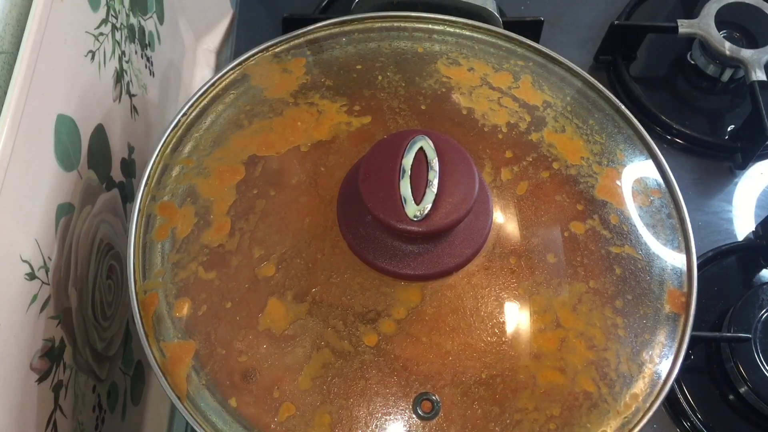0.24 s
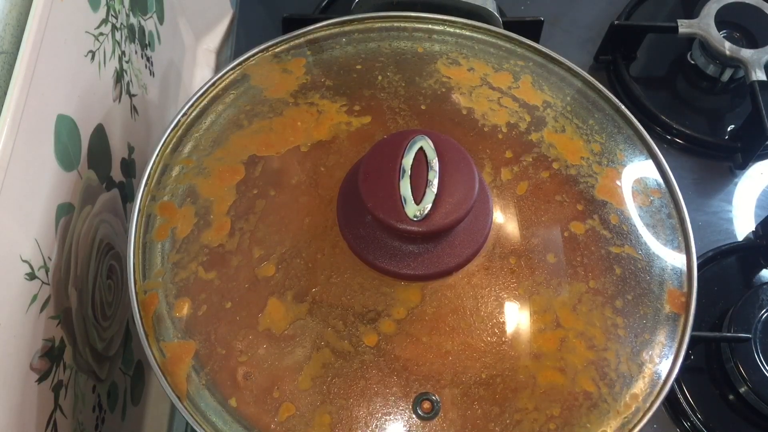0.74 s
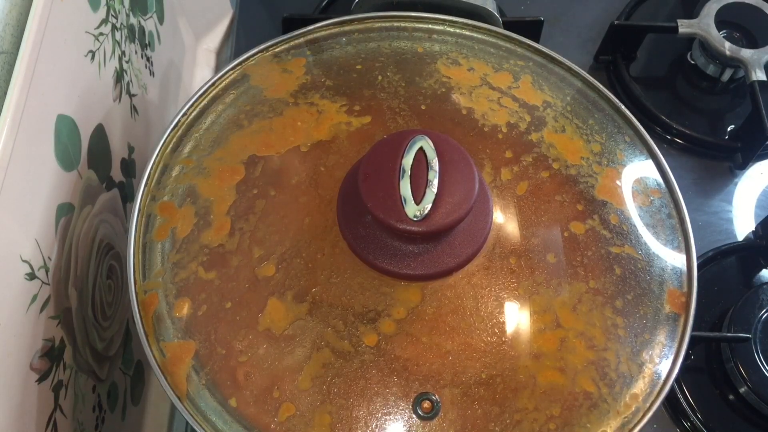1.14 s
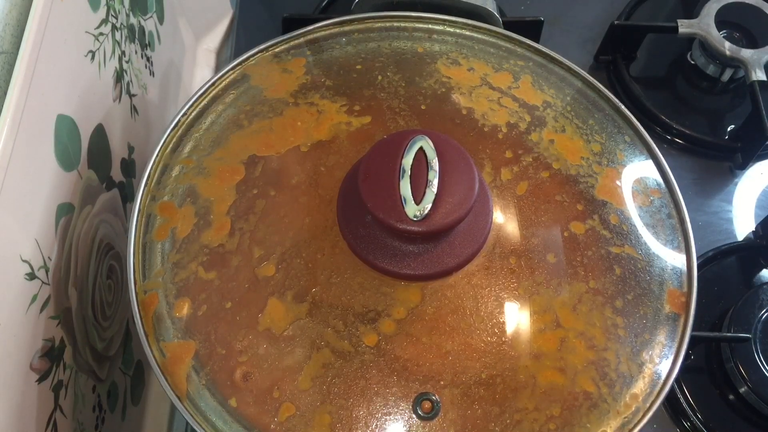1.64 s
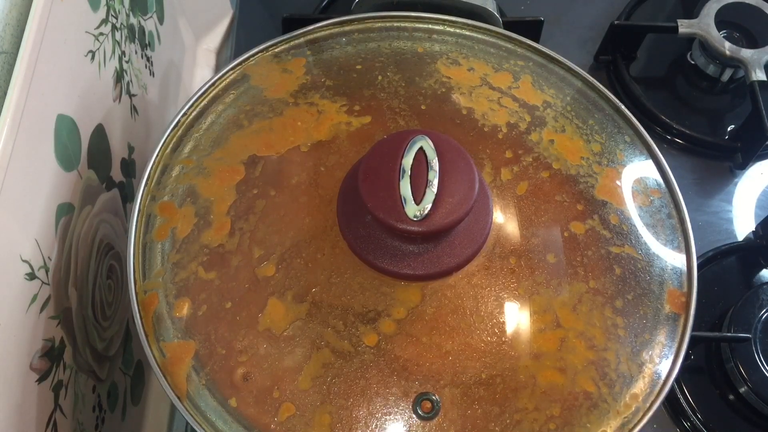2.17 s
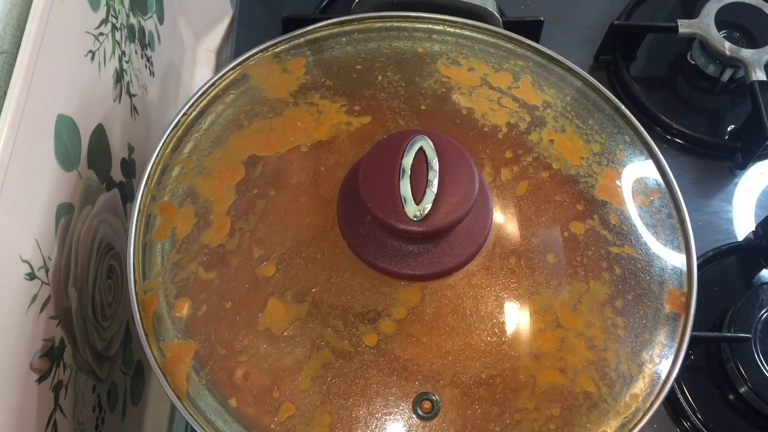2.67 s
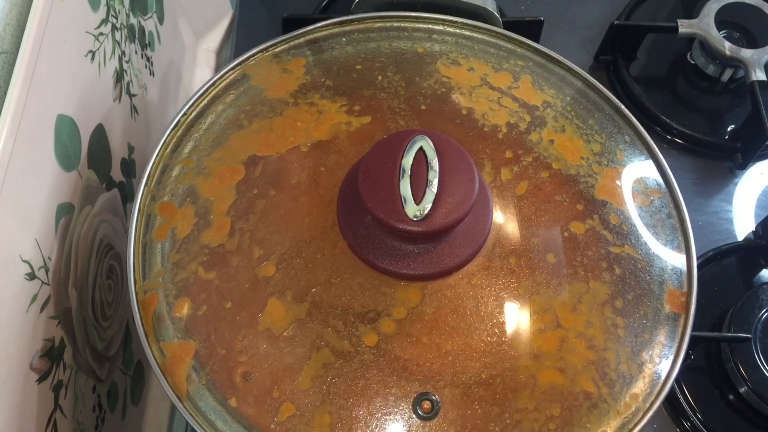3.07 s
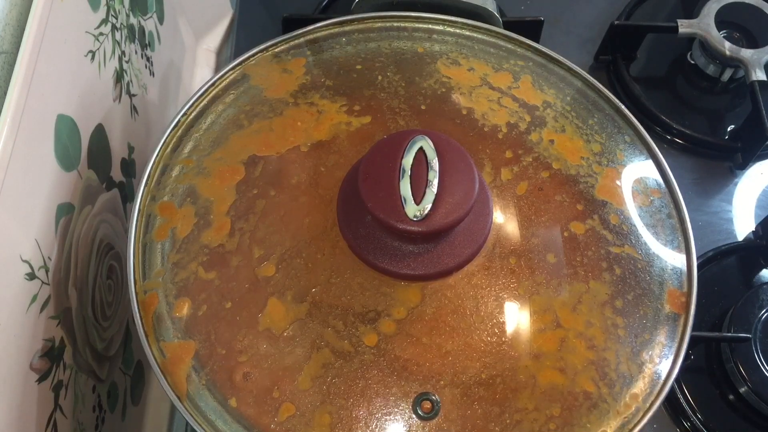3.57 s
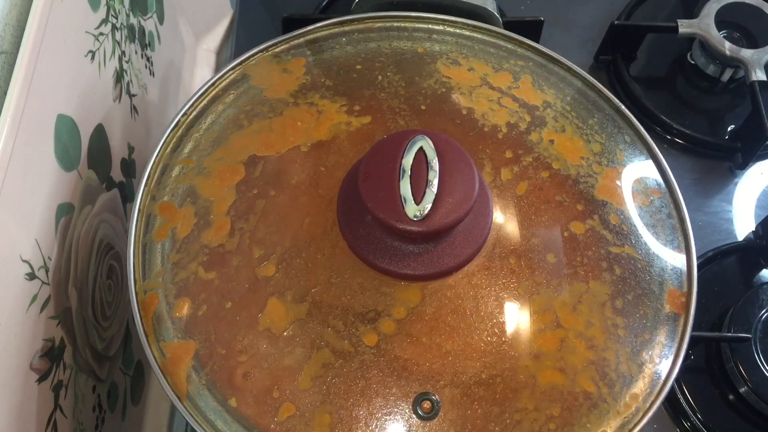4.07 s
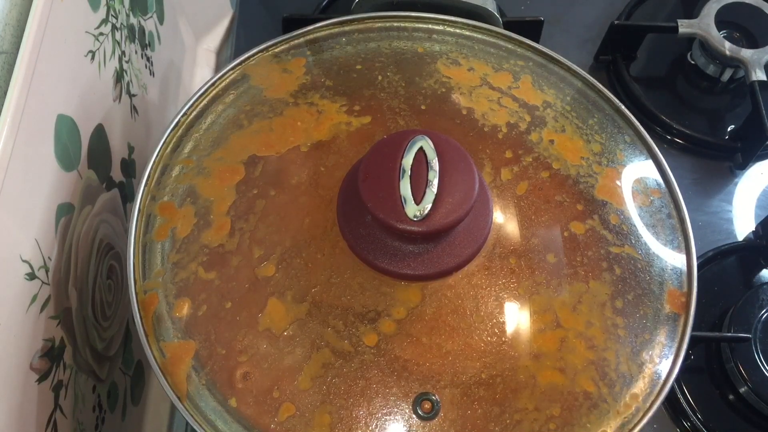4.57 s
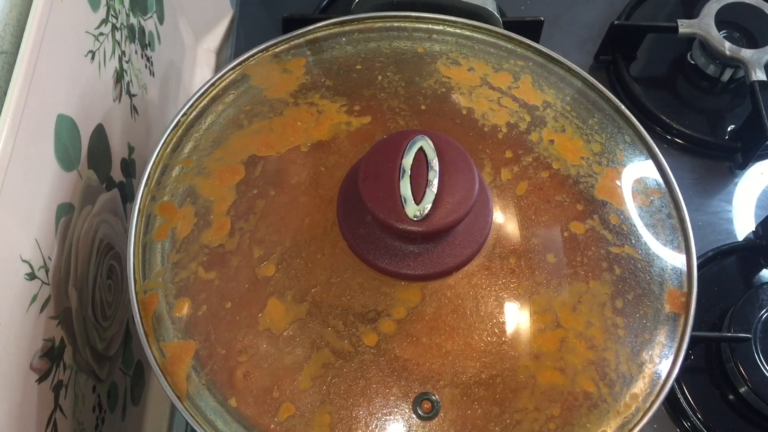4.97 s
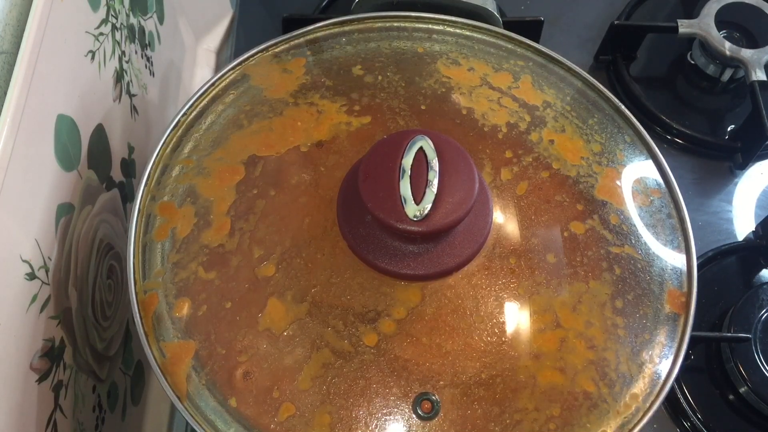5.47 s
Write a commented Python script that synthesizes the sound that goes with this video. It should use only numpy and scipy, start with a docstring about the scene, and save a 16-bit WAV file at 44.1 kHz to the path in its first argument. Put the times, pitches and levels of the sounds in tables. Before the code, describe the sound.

A covered pot of thick sauce bubbles steadily, heard close from above in a small, fairly dry kitchen. Low rounded glugs come irregularly, about a dozen a second, each rising slightly and ringing hollowly under the lid. Wet plips, sharp snaps and tiny spatters scatter between them, over a murmur of small bubbles and a quiet burner rush. The boil eases near two seconds, then grows stronger. Mono.

```python
"""Thick sauce simmers in a steel pot under a glass lid, heard from just above in a small kitchen.
Big bubbles are gliding tones that glug and set the air under the lid ringing.
Their skins snap and throw spray, made of short tones and ragged bursts of noise.
Swarms of tiny gliding tones fill the gaps, over the burner's low rush of filtered noise."""
import sys
import numpy as np
from scipy import signal
from scipy.fft import rfft, irfft, next_fast_len
from scipy.io import wavfile

SR = 44100
rng = np.random.default_rng(int(sys.argv[2]) if len(sys.argv) > 2 else 0)


def digitize_waveform(pressure):
    """Quantize a signal to 16-bit integers and store it at the path in sys.argv[1].

    Rows of a 2-D input are taken as channels; values are limited to [-1, 1].
    """
    field = np.atleast_2d(pressure).T
    bounded = np.clip(field, -1, 1)
    quanta = np.round(bounded * 32767).astype(np.int16)
    wavfile.write(sys.argv[1], SR, quanta)


N = 251811  # length of the scene in samples

# the burner's drone, as resonances: (centre [Hz], width [Hz], relative level [dB])
BURNER_DRONE = [(45.5, 9.8, -31), (140.2, 34, -6.5)]
# vigour of the boil: (time [s], level [dB])
BOIL_VIGOUR = [(0, 3), (1.6, -3.5), (2.3, -1), (2.8, 2), (3.8, 3.5), (4.8, 3.5), (5.7, 1)]

LIFE = np.arange(SR // 6) / SR  # time within one bubble's sound [s]
FREQS = np.fft.rfftfreq(2 * len(LIFE), 1 / SR)  # its spectrum's frequencies [Hz]
FIRST_20_MS = SR // 50  # samples
KITCHEN_T60 = 0.28  # time for the kitchen's echo to fall by 60 dB [s]
TOP_HZ = 15950  # nothing is kept from here up


def amp(db):
    """Turn decibels into a plain multiplier."""
    return 10 ** (np.asarray(db) / 20)


def unit(x):
    """Scale a sound to an rms (average strength) of 1."""
    return x / np.sqrt(np.mean(x ** 2) + 1e-20)


def fade(t60):
    """A steady decay over the life of one bubble, losing 60 dB in t60 seconds."""
    return amp(-60 * LIFE / t60)


def filtered(x, response):
    """Shape x by a complex response, given as a function of frequency."""
    m = next_fast_len(N + SR // 2)  # spare room, so that tails do not wrap round to the start
    freqs = np.fft.rfftfreq(m, 1 / SR)
    return irfft(rfft(x, m) * response(freqs), m)[:N]


def resonances(modes, f):
    """Sum of resonances (Hz, width, dB): each answers most strongly at its own pitch."""
    return sum(amp(db) * 1j * f * width / (hz * hz - f * f + 1j * f * width) for hz, width, db in modes)


def band(f, lo_hz, hi_hz, order=3):
    """Response that passes the pitches between two limits."""
    sos = signal.butter(order, [lo_hz, min(hi_hz, SR / 2 - 1)], "bandpass", fs=SR, output="sos")
    return signal.sosfreqz(sos, f, fs=SR)[1]


def pot(f, high_db=-12, top_db=-22, leak_db=-35):
    """The covered pot: its resonances, and a little sound that slips past the lid."""
    # low resonances: (centre [Hz], width [Hz], relative level [dB])
    low_modes = [(132.6, 9.6, -8.5), (231.2, 26.4, -7.5), (323, 15, -1.5), (333.9, 17.3, -1),
                 (375, 12.6, -7.5), (496, 16.2, -2.5), (621.4, 13.7, -15.5), (860, 87, -34),
                 (998, 95, -24.5), (1092.5, 19.4, -15), (1153, 9.6, -2), (1162.4, 15.2, -4),
                 (1544, 43, -21), (1926, 35, -19.5), (2224, 40, -19.5)]
    # high resonances: (centre [Hz], width [Hz], level before high_db [dB])
    high_modes = [(1801, 93, -3.5), (2458, 81, -2), (3090, 72, -1), (3335, 24, -4.5), (3724, 27, -2),
                  (4084, 104, 1), (4487, 51, 1.5), (4605, 38, -1.5), (5050, 25, 5), (5410, 190, -3),
                  (6020, 85, -4)]
    # thin ring of lid and rim: (centre [Hz], width [Hz], level before top_db [dB])
    top_modes = [(6590, 110, 2), (6700, 27, -18), (8030, 67, -11), (8400, 110, -9), (8870, 40, -1),
                 (9280, 62, -0.5), (8400, 29, -35), (11020, 140, -6), (15500, 97, -3)]
    upper = amp(high_db) * resonances(high_modes, f) + amp(top_db) * resonances(top_modes, f)
    return resonances(low_modes, f) + upper + amp(leak_db)


def echoes(t60, swell, grain_db, kitchen_db=-19):
    """Spectrum of a ragged noise burst that swells and dies in the pot, then the kitchen; new each time."""
    knots = rng.standard_normal(len(LIFE) // 64 + 2)
    grain = amp(grain_db * np.interp(LIFE, np.linspace(0, LIFE[-1], len(knots)), knots))
    decay = grain * fade(t60) + amp(kitchen_db) * fade(KITCHEN_T60)
    envelope = (1 - np.exp(-LIFE / swell)) * decay
    burst = envelope * rng.standard_normal(len(LIFE))
    return rfft(burst / np.linalg.norm(burst), 2 * len(LIFE))


def bubble(hz, cycles, rise):
    """Spectrum of a bubble that fades over some cycles; its pitch rises as it opens."""
    t60 = cycles / hz
    progress = np.minimum(LIFE / t60, 1)
    # the nominal pitch is reached a quarter of the way through
    phase = 2 * np.pi * hz * np.cumsum(1 + rise * (progress - 1 / 4)) / SR
    return rfft(np.sin(phase) * fade(t60), 2 * len(LIFE))


def add(track, s, db, spectrum, damping=1):
    """Lay one sound into the track at s seconds, with db as the level of its first 20 ms."""
    x = irfft(spectrum)[:len(LIFE)] * damping
    head = x[:FIRST_20_MS]
    start = max(round(s * SR), 0)
    track[start:][:len(x)] += amp(db) * x / np.sqrt(np.mean(head ** 2))


def swarm(rate, hz, spread, cycles, size_db):
    """Small bubbles, rate a second, at random moments, pitches and sizes, ringing in the pot; rms 1."""
    when, pitch, size = rng.random((int(rate * N / SR), 3)).T[:, :, None]
    t = LIFE[:FIRST_20_MS]
    note = hz * np.exp(spread * (2 * pitch - 1))
    age = t * note / cycles  # reaches 1 when the bubble has faded by 60 dB
    phase = 2 * np.pi * note * t * (1 + np.minimum(age, 1) / 8)  # the pitch climbs as it fades
    rings = amp(size_db * size ** 2 - 60 * age) * np.sin(phase)
    places = (when * N).astype(int) + np.arange(len(t))
    track = np.bincount(places.ravel(), rings.ravel(), N)[:N]
    reflections = irfft(echoes(t60=0.082, swell=0.002, grain_db=1.0))
    spread_out = signal.fftconvolve(track, reflections)[:N]
    return unit(filtered(spread_out, pot))


def simmer():
    """Countless small bubbles murmur, burble and chirp in the pot, and the smallest fizz along its wall."""
    vigour_db = np.interp(np.arange(N) / SR, *np.transpose(BOIL_VIGOUR))
    murmur = swarm(rate=70, hz=333, spread=0.25, cycles=4.0, size_db=8.5)
    burble = swarm(rate=53, hz=817, spread=0.27, cycles=13.4, size_db=17)
    burble = filtered(burble, lambda f: band(f, 594, 1200))
    chirps = swarm(rate=28, hz=1970, spread=0.42, cycles=19, size_db=11)
    chirps = filtered(chirps, lambda f: band(f, 950, 2760))
    fizz = swarm(rate=55, hz=3930, spread=0.58, cycles=9.8, size_db=19.5)
    fizz = filtered(fizz, lambda f: band(f, 2150, 11000))
    small = amp(-55.5) * murmur + amp(-69.5) * unit(burble) + amp(-74.5) * unit(chirps)
    # the fizz follows the vigour twice as strongly
    return amp(vigour_db) * small + amp(2.0 * vigour_db - 78.5) * unit(fizz)


def burner():
    """The flame's drone and the even hiss of the kitchen, both steady noise shaped by filters."""
    # colour of the hiss: (frequency [Hz], relative level per Hz [dB])
    hiss_colour = [(20, -18), (45, 7), (75, -13), (120, 15), (200, -3.5), (450, -5.5), (800, -18.5),
                   (1500, -17.5), (3000, -22.5), (6000, -28), (9500, -28.5), (10300, -35.5), (11500, -29.5),
                   (16000, -36.5)]
    hz, db = np.transpose(hiss_colour)
    hiss = filtered(rng.standard_normal(N), lambda f: amp(np.interp(np.log(f + 1), np.log(hz), db)))
    drone = filtered(rng.standard_normal(N),
                     lambda f: resonances(BURNER_DRONE, f) * band(f, 25, 121, order=2))
    return amp(-57.5) * unit(hiss) + amp(-57.0) * unit(drone)


def lesser_glugs(count):
    """Quieter glugs at random moments, as rows like those of the big bubbles; they follow the boil."""
    middle_hz, pitch_spread = 327, 0.13  # the spread is relative
    base_db, scatter_db = [-48.5, -64, -61.5], 5  # glug, heave and ring, before vigour and scatter
    when, pitch, *sizes = rng.uniform(-1, 1, (count, 5)).T
    s = (when + 1) / 2 * N / SR
    swing_db = np.interp(s, *np.transpose(BOIL_VIGOUR)) + scatter_db * np.array(sizes)
    levels = swing_db.T + base_db
    return np.column_stack([s, middle_hz * np.exp(pitch_spread * pitch), levels])


def glugs():
    """Each big bubble sounds its note, heaves the sauce, rings the pot and ticks faintly just after it starts."""
    # big bubbles that stand out:
    # (time [s], pitch [Hz], glug [dB], heave of the sauce [dB], ring of the pot [dB])
    big_bubbles = [(0.059, 350, -45, -57, -53.5), (0.113, 340, -47, -59, -79),
                   (0.18, 360, -39.5, -49, -47.5), (0.197, 390, -39.5, -75, -45.5),
                   (0.315, 338, -41, -48, -55), (0.393, 355, -47.5, -53, -49.5),
                   (0.458, 334, -39.5, -62, -51), (0.557, 353, -51, -72, -52.5),
                   (0.737, 322, -45, -81, -55.5), (0.773, 342, -45.5, -56, -53),
                   (0.815, 340, -41.5, -46, -49.5), (0.966, 322, -42.5, -52, -47.5),
                   (1.079, 344, -40, -51, -44), (1.143, 330, -46, -62, -52.5),
                   (1.223, 376, -43, -64, -50.5), (1.269, 370, -40.5, -62, -58),
                   (1.387, 340, -47.5, -61, -49.5), (1.43, 330, -43.5, -71, -49.5),
                   (1.602, 315, -41, -44, -51), (1.693, 346, -44, -48, -48.5),
                   (1.742, 411, -42, -49, -46.5), (1.779, 342, -41.5, -53, -47),
                   (1.833, 344, -46, -52, -52), (1.96, 333, -47, -76, -51), (2.018, 360, -47.5, -53, -52),
                   (2.077, 334, -41.5, -52, -54), (2.211, 323, -42.5, -50, -46.5),
                   (2.479, 343, -46.5, -47, -51), (2.555, 357, -44, -62, -55),
                   (2.579, 350, -39.5, -49, -54), (2.599, 418, -43.5, -51, -46),
                   (2.674, 356, -42, -45, -55), (2.75, 341, -47.5, -47, -61), (2.824, 380, -38.5, -63, -51),
                   (2.911, 346, -39, -62, -43.5), (2.979, 354, -46.5, -49, -52),
                   (2.995, 356, -46.5, -45, -47), (3.122, 340, -45, -73, -51.5),
                   (3.151, 365, -46, -48, -82), (3.204, 364, -46.5, -55, -55.5),
                   (3.302, 358, -41, -45, -58), (3.322, 370, -46.5, -55, -44), (3.4, 341, -45.5, -74, -59),
                   (3.542, 328, -40, -73, -60), (3.573, 342, -41, -64, -50.5),
                   (3.632, 343, -44.5, -71, -47.5), (3.657, 357, -44, -53, -53.5),
                   (3.704, 380, -51, -69, -48), (3.82, 336, -34.5, -41.5, -48.5),
                   (3.852, 387, -40, -43.5, -68), (3.914, 332, -44, -73, -61.5),
                   (3.967, 380, -47, -47, -51.5), (4.13, 500, -48, -47, -51), (4.207, 360, -42, -48, -50.5),
                   (4.244, 370, -47, -47, -50.5), (4.282, 390, -35, -51, -43),
                   (4.319, 370, -38.5, -41.5, -42.5), (4.397, 340, -43.5, -67, -63),
                   (4.453, 378, -47, -48, -57), (4.553, 316, -45, -47, -58), (4.587, 350, -40, -55, -52.5),
                   (4.67, 337, -39, -52, -50), (4.714, 372, -54, -50, -49), (4.746, 372, -52, -49.5, -47.5),
                   (4.804, 327, -45.5, -47, -52), (4.908, 455, -43.5, -54, -53),
                   (5.05, 389, -43, -50, -53.5), (5.07, 398, -35, -43, -48), (5.179, 379, -41.5, -63, -58),
                   (5.209, 372, -48.5, -47.5, -42.5), (5.3, 341, -42, -62, -51),
                   (5.347, 374, -45, -64, -45.5), (5.396, 344, -46, -69, -55), (5.49, 361, -43.5, -47, -56),
                   (5.65, 342, -41.5, -44, -46.5)]
    glug_t60, heave_t60, ring_t60 = 0.4, 0.36, 0.3  # extra damping by the thick sauce and the steam [s]
    overtones_db = -15.5  # higher modes of the air under the lid, relative to its deep ring
    tick_db, tick_scatter_db = -33.5, -2.5  # relative to the glug
    tick_delay_s = 0.012  # at most

    out, body = np.zeros(N + SR), pot(FREQS)
    low = (body + 0.47 * resonances(BURNER_DRONE, FREQS)) * band(FREQS, 48, 205)
    middle = body * band(FREQS, 190, 760)
    upper = body * band(FREQS, 790, 1170)
    overtones = resonances([(1839, 42, 1.5), (2484, 24, -2), (3156, 27, -6)], FREQS)
    thin = body * band(FREQS, 2900, 12000)
    for s, hz, db, heave_db, ring_db in [*big_bubbles, *lesser_glugs(count=16)]:
        # one clean push of steam and its reflections
        push = 0.5 + 0.74 * echoes(t60=0.029, swell=0.0054, grain_db=0.0)
        note = bubble(hz, cycles=8, rise=0.14)
        add(out, s, db, middle * note * push, fade(glug_t60))
        add(out, s, heave_db, low * push, fade(heave_t60))

        place, size, colour = rng.standard_normal(3)
        spot = 1 + 1.34 * resonances([(1150 + 45 * place, 90, 0)], FREQS)  # each spot favours other modes
        add(out, s, ring_db, upper * spot * push, fade(ring_t60))
        add(out, s, ring_db + overtones_db, overtones * push)

        tick_colour = resonances([(5600 * np.exp(0.39 * colour), 2200, 0)], FREQS)
        tick = thin * tick_colour * echoes(t60=0.064, swell=0.0008, grain_db=2)
        add(out, s + tick_delay_s * rng.random(), db + tick_db + tick_scatter_db * size, tick)
    return out[:N]


def snaps():
    """A skin starts to give, then tears: a wet plip from the hollow, a snap from the skin, a spit of spray."""
    # bursting skins that stand out: (time [s], plip pitch [Hz], plip level [dB],
    # snap pitch [Hz], snap level [dB], spray centre [Hz], spray level [dB])
    bursting_skins = [(0.073, 1020, -60.5, 3900, -56.5, 7360, -58.5),
                      (0.199, 1940, -45.5, 2380, -57, 9400, -83), (0.235, 1810, -66, 2430, -61, 9300, -62),
                      (0.41, 1800, -62, 2480, -56.5, 7100, -66.5),
                      (0.564, 1850, -58.5, 2720, -86, 8100, -88),
                      (0.599, 1750, -55.5, 2730, -54.5, 9850, -71),
                      (0.758, 2000, -51, 2830, -46, 8700, -59.5), (0.839, 1790, -56, 2500, -64, 8900, -66),
                      (0.906, 880, -51, 3170, -70, 8800, -74), (0.969, 1730, -48, 4000, -46.5, 10400, -67),
                      (1.071, 1840, -49, 2460, -50.5, 7300, -50.5),
                      (1.141, 1830, -58.5, 2350, -63.5, 8500, -81),
                      (1.224, 1840, -48.5, 2360, -71, 10900, -66.5),
                      (1.397, 990, -70, 3070, -48, 9300, -62),
                      (1.432, 1490, -48.5, 3820, -44.5, 8700, -61.5),
                      (1.619, 994, -51, 2700, -55, 12300, -59.5), (1.743, 714, -50, 2850, -53, 8900, -84),
                      (1.779, 1930, -54, 3050, -50, 7240, -62), (1.835, 1830, -56.5, 2560, -72, 6900, -70),
                      (2.04, 1010, -56, 2850, -57.5, 7200, -70.5),
                      (2.112, 1550, -54.5, 2460, -56, 7200, -81),
                      (2.219, 1000, -71, 2670, -57, 9100, -63.5),
                      (2.407, 1820, -62.5, 3330, -55.5, 6500, -63),
                      (2.485, 1880, -71, 3000, -48.5, 6600, -54.5),
                      (2.603, 1990, -49, 2180, -55, 6450, -61.5), (2.674, 1880, -61, 2390, -57, 8800, -81),
                      (2.72, 1930, -70, 3110, -57, 7500, -63.5),
                      (3.009, 1000, -51.5, 3640, -44.5, 6050, -52),
                      (3.219, 796, -47, 2740, -47.5, 6950, -56.5), (3.322, 970, -51, 2820, -78, 8300, -69),
                      (3.544, 1910, -72, 2680, -57, 7400, -71), (3.613, 950, -54, 2370, -50.5, 9100, -77),
                      (3.668, 970, -66, 3860, -63, 7500, -66.5), (3.848, 1860, -59.5, 4090, -68, 7400, -67),
                      (3.937, 1980, -55.5, 2340, -66, 8100, -82),
                      (3.979, 1480, -53, 4160, -54.5, 6260, -65.5),
                      (4.04, 980, -51, 3900, -61.5, 6200, -73), (4.111, 690, -63, 3050, -62, 7540, -58.5),
                      (4.281, 990, -47, 2970, -45.5, 11300, -63.5),
                      (4.3203, 700, -45, 3120, -46.5, 9100, -42.5),
                      (4.419, 1730, -78, 4140, -57.5, 9000, -63.5),
                      (4.567, 1920, -57, 2760, -47.5, 9300, -60),
                      (4.621, 1750, -52.5, 3860, -61, 8000, -59),
                      (4.714, 1390, -47, 3760, -51.5, 5660, -56), (4.883, 1800, -58, 3930, -63, 6760, -59),
                      (4.909, 1800, -59, 3600, -46, 5560, -53.5),
                      (5.069, 1980, -46.5, 2680, -47.5, 8900, -55),
                      (5.113, 1810, -59, 2800, -57.5, 6400, -64),
                      (5.218, 2060, -50.5, 3060, -49.5, 8900, -63),
                      (5.355, 657, -47.5, 2470, -67, 7600, -55.5),
                      (5.487, 1940, -66, 2750, -58.5, 7600, -75),
                      (5.529, 1850, -66, 4030, -72, 6870, -59.5),
                      (5.651, 1970, -52.5, 2220, -59, 7480, -59.5)]
    crackle_lead_s, crackle_db = 0.007, -12.5  # a skin crackles faintly before it goes
    mist_t60 = 0.68  # extra damping of the spray by the steam [s]

    out, body = np.zeros(N + SR), pot(FREQS)
    # the deep ring is left to the glugs
    wet = body * band(FREQS, 510, 2220) * (1 - resonances([(1139, 51, 0)], FREQS))
    bright = body * band(FREQS, 1960, 4840)
    spit = body * band(FREQS, 5080, 18000)
    for s, plip_hz, plip_db, snap_hz, snap_db, spray_hz, spray_db in bursting_skins:
        slosh = 0.46 + 0.91 * echoes(t60=0.076, swell=0.0012, grain_db=1.5)
        add(out, s, plip_db, wet * bubble(plip_hz, cycles=6.6, rise=0.3) * slosh)

        skin = bright * bubble(snap_hz, cycles=10.3, rise=0.068)
        mist = spit * (0.2 + resonances([(spray_hz, 2000, 0)], FREQS))
        crackle = echoes(t60=0.05, swell=0.003, grain_db=5)
        add(out, s - crackle_lead_s, snap_db + crackle_db, skin * crackle)
        add(out, s - crackle_lead_s, spray_db + crackle_db, mist * crackle)

        add(out, s, snap_db, skin * echoes(t60=0.046, swell=0.00025, grain_db=6.5))
        spray = mist * echoes(t60=0.046, swell=0.0027, grain_db=3)
        add(out, s, spray_db, spray, fade(mist_t60))
    return out[:N]


def scene():
    """All the sounds of the pot and the kitchen together, in one channel."""
    return (simmer() + burner() + glugs() + snaps())[None]


def record(dry):
    """The recorder drops the deepest rumble and keeps nothing above its band limit."""
    low_cut = lambda f: band(f, 33, SR / 2, order=3)
    return filtered(dry[0], lambda f: low_cut(f) * (f < TOP_HZ))[None]


dry = scene()
out = record(dry)
digitize_waveform(out)
```